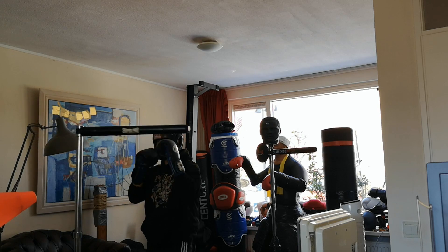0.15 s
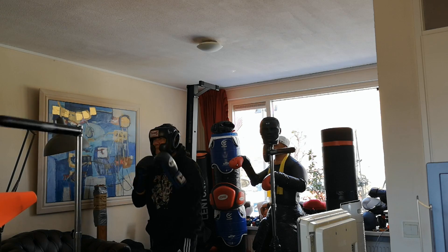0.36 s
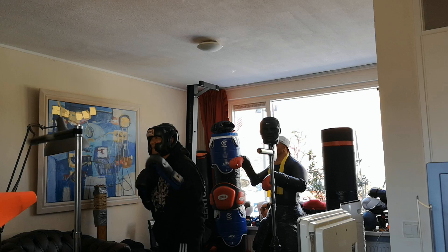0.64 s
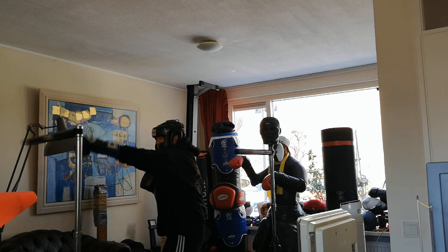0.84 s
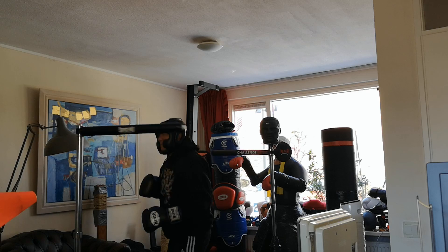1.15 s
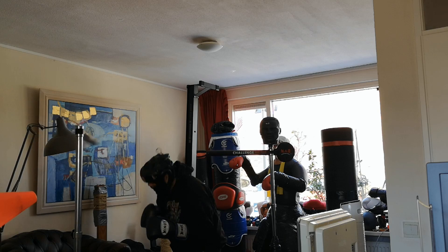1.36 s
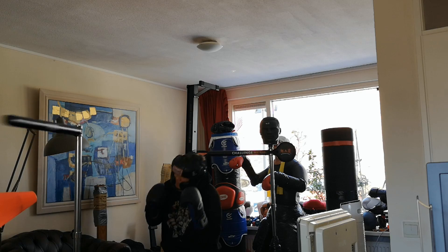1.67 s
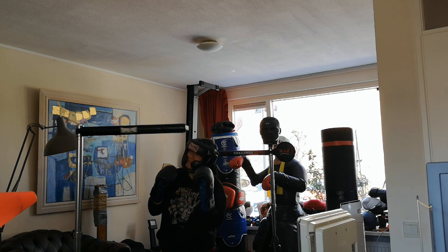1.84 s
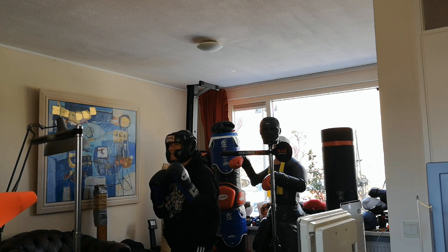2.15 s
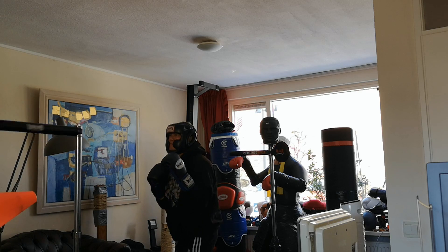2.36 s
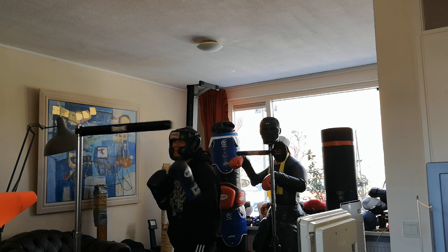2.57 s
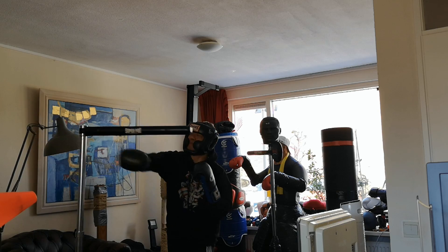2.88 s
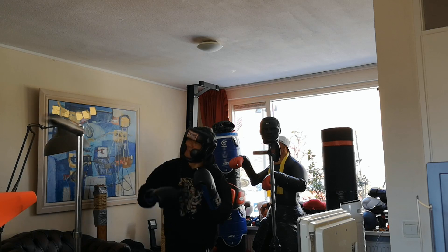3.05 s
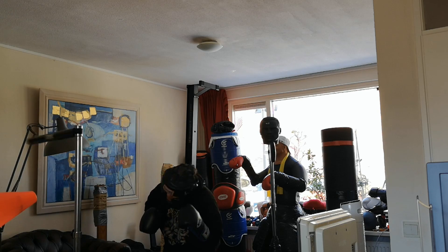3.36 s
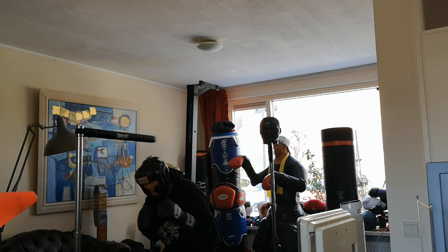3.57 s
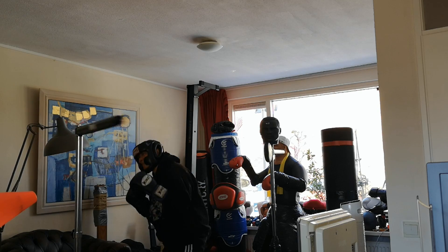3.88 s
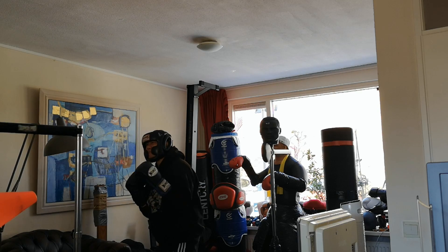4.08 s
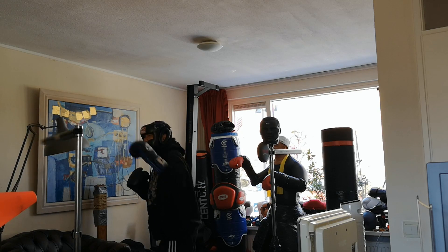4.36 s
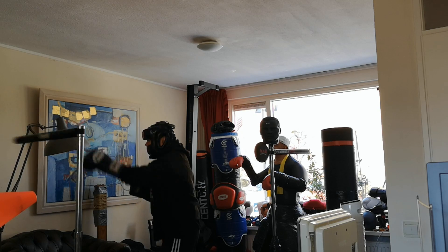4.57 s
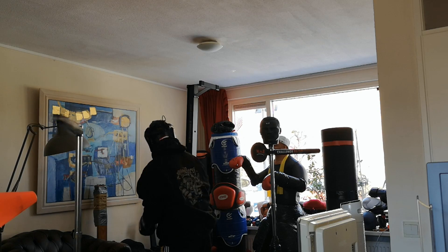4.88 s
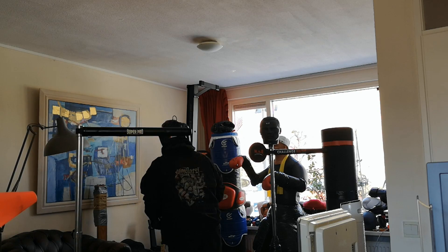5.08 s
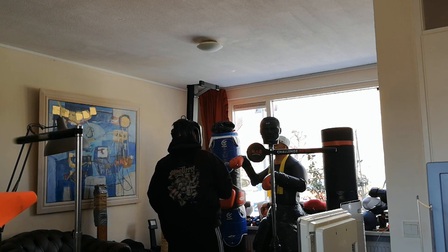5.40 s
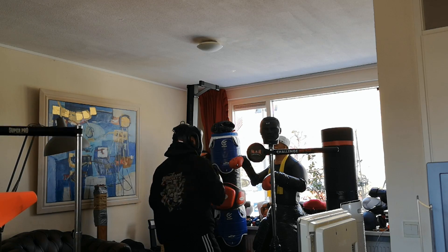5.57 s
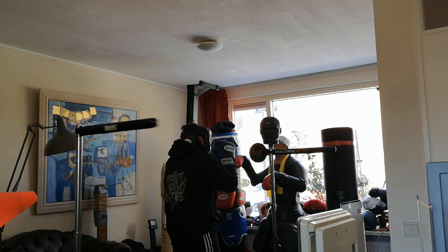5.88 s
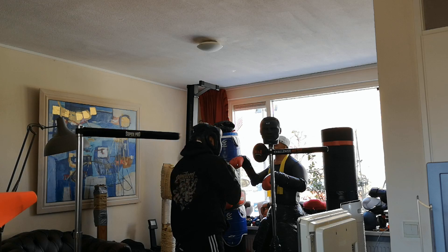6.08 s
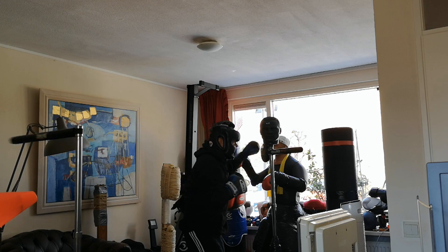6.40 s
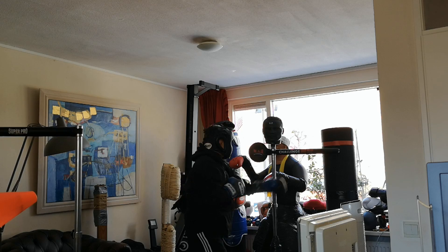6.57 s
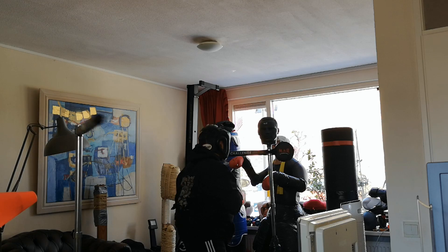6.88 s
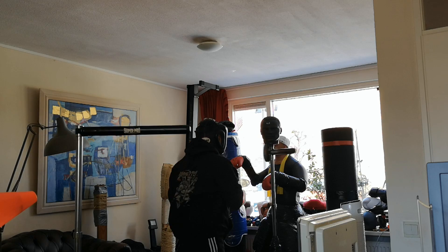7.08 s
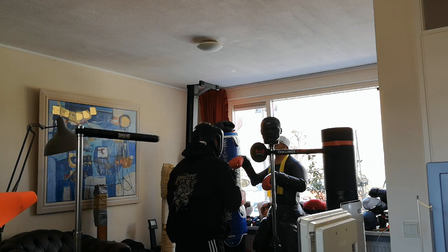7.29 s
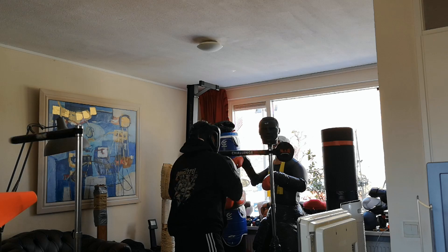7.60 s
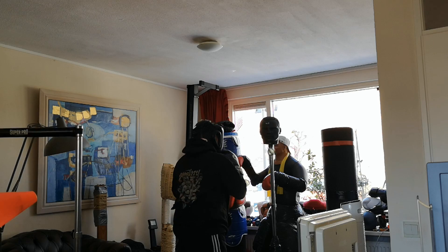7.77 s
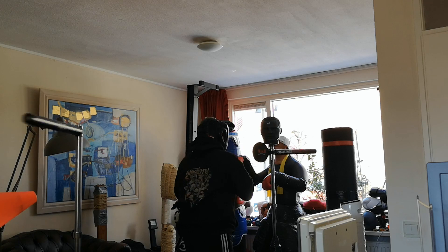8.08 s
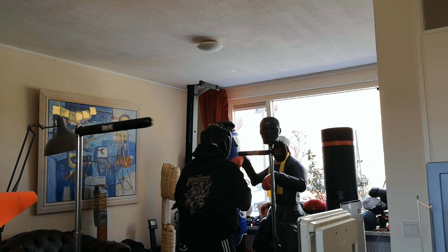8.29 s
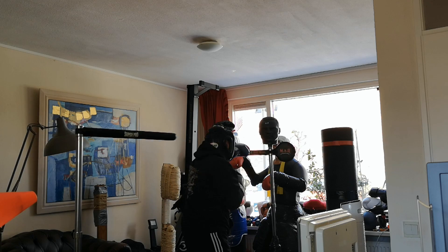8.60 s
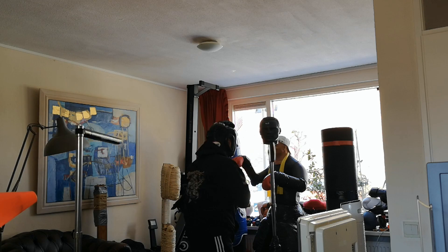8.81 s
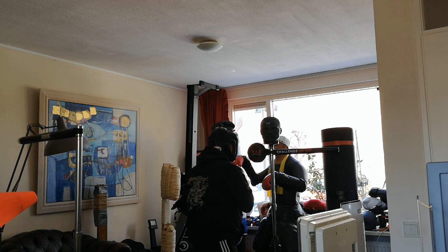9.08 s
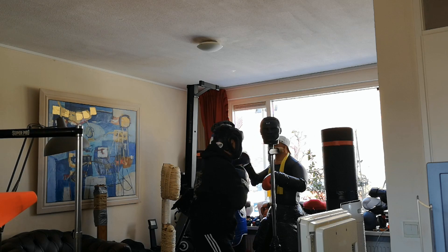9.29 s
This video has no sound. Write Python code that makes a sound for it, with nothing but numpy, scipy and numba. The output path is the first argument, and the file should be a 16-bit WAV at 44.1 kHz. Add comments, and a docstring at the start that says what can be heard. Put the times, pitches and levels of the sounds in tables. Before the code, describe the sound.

Hard, slappy boxing blows and deep floor thumps come in bursts, separated by faint scuffing shoes, light taps and a very quiet room.

```python
"""A boxer trains in a living room, hitting padded bars and bags with gloves.
A hard blow opens; scuffs and rustles lead to a flurry from 1.2 s, then shoes drag until a second flurry at 3 s.
After soft scuffs a hard blow lands at 4.9 s; lighter blows and steps follow, with hard ones at 6.9 s and 8.9 s.
Each blow is noise shaped into a crack and a short tail; scuffs are swelling noise; jolts shake a springy floor.
A faint hush and tremor run throughout; two microphones hear it all and a suppressor turns quiet sound down."""
import sys
import numpy as np
from scipy import signal
from scipy.fft import rfft, irfft
from scipy.io import wavfile
from scipy.ndimage import uniform_filter1d
from numba import njit

SR = 44100
rng = np.random.default_rng(int(sys.argv[2]) if len(sys.argv) > 2 else 0)


def unload_audio(sound):
    """Save the sound as a 16-bit wav file, at the path given as the first command line argument."""
    columns = np.transpose(np.atleast_2d(sound))
    # keep every value between -1 and 1, then stretch to whole-number steps
    steps = np.round(np.clip(columns, -1, 1) * 32767)
    wavfile.write(sys.argv[1], SR, steps.astype(np.int16))


N = 416744  # samples, about 9.45 s

# Blows and steps, in order of time. Levels are those before the suppressor.
# Columns: start [t/s], slap [level/dB], body, edge and treble against the slap [level/dB],
# 60 dB tail fall before TAIL_FALL scales it [t/s], tail build-up [t/s], ring [f/Hz], ring against the slap [level/dB]
BLOWS = [(0.002, -34, 1, -7, -8, 0.65, 0.0038, 2420, -22),
         (0.802, -41.5, -4, -3, -29, 0.51, 0.0069, 1960, -10),
         (1.157, -31, 2.5, -11, -2, 0.64, 0.0039, 1860, -21),
         (1.19, -37.5, 5, -1.5, -10, 0.62, 0.0047, 1430, -21),
         (1.319, -38, 2, -4, -8.5, 0.72, 0.0081, 2630, -15.5),
         (1.459, -45, -14, -6.5, -0.5, 0.34, 0.0042, 1850, -3),
         (1.586, -50.5, 1, -13, -17, 1, 0.0037, 1680, -3),
         (1.608, -44, -4.5, -23, -30, 1, 0.0069, 1810, -8),
         (1.661, -42, -8.5, -17.5, -15.5, 0.62, 0.0084, 1860, -10),
         (2.526, -56, 5, -40, -33, 0.67, 0.0029, 1410, -2.5),
         (2.7, -56.5, -10, -13, -4, 0.31, 0.0027, 1850, -6),
         (3.015, -39.5, -7, -8, -11.5, 0.48, 0.015, 1850, -12),
         (3.158, -30, 4.5, -13, -3.5, 0.62, 0.0056, 1770, -8),
         (3.199, -30, -9, -5.5, -20, 0.36, 0.0044, 1690, -23),
         (3.277, -35, 3.5, -19, -6, 0.62, 0.0026, 2360, -7),
         (3.34, -36, 0, -9.5, -7.5, 0.64, 0.0075, 1780, -10.5),
         (3.469, -44.5, -7, 0.5, -1, 0.4, 0.0095, 1770, -3.5),
         (3.759, -50.5, -6, 7.5, 1, 0.45, 0.036, 2730, 0.5),
         (4.886, -28.5, 5, -11.5, -1, 0.43, 0.0056, 1760, -12),
         (4.969, -38.5, -2, -10, -6, 0.98, 0.01, 1730, -19),
         (5.188, -55.5, -9, 5.5, 1, 0.3, 0.0064, 1870, -9),
         (5.471, -41.5, -10.5, -12.5, -21, 0.44, 0.0065, 1980, -16),
         (5.534, -53.5, 2.5, -24, -33, 0.45, 0.0022, 1970, -16),
         (5.847, -37, -12, -15, -16.5, 0.41, 0.0081, 2060, -13),
         (6.266, -51, 0.5, -3, -14, 0.57, 0.0058, 1680, -19),
         (6.309, -47, 0, -22, -28, 0.29, 0.0026, 1520, -5),
         (6.597, -49, -1.5, -26, -34, 1, 0.0063, 1530, -15.5),
         (6.839, -38.5, -13, -1, -25, 0.47, 0.0033, 1950, 2.5),
         (6.882, -30.5, -3.5, -10.5, -3.5, 0.49, 0.0032, 1680, -14),
         (7.147, -37.5, -11, -6.5, -22.5, 0.53, 0.0043, 1710, -25),
         (7.228, -43.5, 5, -23, -15, 0.24, 0.0046, 2750, -4),
         (7.521, -48, -13, -17, -18, 0.73, 0.0052, 1800, -6),
         (7.618, -46, -5, -23, -30, 0.48, 0.0035, 1840, -21),
         (7.731, -49.5, -9, -42, -34, 0.48, 0.0072, 1990, -22),
         (8.168, -48, -3, -15, -44, 0.46, 0.0045, 1820, -6),
         (8.6, -46, -1, -47, -43, 0.54, 0.0068, 1660, -12),
         (8.94, -31.5, 1, -9, -3, 0.53, 0.0065, 2510, -12),
         (9.215, -52.5, -7, -20, -19.5, 0.78, 0.013, 1750, -10),
         (9.306, -53.5, -18, -10, -12, 0.26, 0.0036, 1780, -16)]
# How quickly each pitch dies away. Columns: [f/Hz], factor on a blow's tail time [no unit]
TAIL_FALL = [(200, 0.53), (2000, 1.22), (6000, 1.245), (13000, 0.7)]
CRACK_DB, TAIL_DB = -3, -6.5  # against the slap
CRACK_FULL_S = 0.0045  # the build-up time at which the crack has exactly CRACK_DB
TAIL_HOLD_S = 0.098  # the tail fades faster after this
BLOW_PAN_DB = -0.5  # left minus right


def blows(hz, ringing=False):
    """Power at both ports in one band: a crack, then a noisy tail that builds up and dies away."""
    power = np.zeros(N + SR)
    t = np.arange(SR // 2 + SR // 4) / SR
    crack = undb(2 * CRACK_DB) * np.exp(-t / 0.00092)
    # after the hold, the tail dies 1.4 times as fast
    fade = t + 0.4 * np.maximum(t - TAIL_HOLD_S, 0)
    for s, db, body_db, edge_db, treble_db, t60, rise_s, _, ring_db in BLOWS:
        build_up = 1 - np.exp(-t / rise_s)
        die_away = np.exp(-2 * np.log(1000) * fade / (t60 * on_log(TAIL_FALL, hz)))
        # the slower a blow sinks in, the weaker its crack
        shape = undb(2 * TAIL_DB) * build_up * die_away + crack * (CRACK_FULL_S / rise_s) ** 3.0
        colour_db = ring_db if ringing else tilted(hz, (150., 600.), body_db, edge_db, treble_db)
        start = int(s * SR)
        power[start:start + len(t)] += undb(2 * (db + colour_db)) * shape
    return power[:N] * undb(BLOW_PAN_DB * np.array([[1], [-1]]))


# Shoes dragging and cloth rubbing. Levels are those before the suppressor.
# Columns: full strength from [t/s], rise [t/s], hold [t/s], slap-band [level/dB],
# body, edge and treble against that [level/dB], ring [f/Hz], ring against that [level/dB]
RUBS = [(0.3, 0.08, 0.13, -65.5, -10, -0.5, -6, 2100, -18), (0.55, 0.25, 0.46, -69, -15, -4, -8, 2070, -11),
        (1.036, 0.097, 0.09, -67.5, -10.5, -25, -17, 1880, -16),
        (1.93, 0.043, 0.062, -65, -15.5, -25, -26, 1970, -15),
        (2.4, 0.15, 0.095, -66, -19, -1.5, -15, 2270, -24), (2.6, 0.1, 0.06, -69.5, -9, -23, -17, 1900, 0),
        (2.75, 0.042, 0.052, -55, -36, -20, -7.5, 1790, 3.5),
        (2.808, 0.097, 0.039, -49.5, -27, -3.5, -11, 2320, -12),
        (2.88, 0.061, 0.017, -52.5, -5.5, -27, -31, 2100, -8),
        (2.96, 0.04, 0.062, -58.5, -15, -9, -11, 2060, -13), (3.62, 0.05, 0.14, -69, -8, -8, -2, 2060, -18),
        (4.08, 0.06, 0.02, -68.5, -21, -20, -14, 1990, -16),
        (4.21, 0.055, 0.07, -66, -11, -17, -10, 2100, -13),
        (4.291, 0.01, 0.17, -46.5, -30.5, -7.5, -15.5, 2160, -4),
        (4.73, 0.099, 0.051, -61.5, -16, -32, -15, 2000, -14),
        (5.27, 0.023, 0.078, -69.5, -7, -7, -8, 2100, -13.5),
        (5.44, 0.29, 0.027, -61.5, -15, -11, -6, 2160, -20),
        (6.14, 0.17, 0.11, -69, -28.5, 11, -15, 2300, -4),
        (6.19, 0.06, 0.11, -66.5, -14, 7, -10, 2250, -24),
        (6.33, 0.16, 0.087, -56, -15.5, -2.5, -10, 2080, -20), (6.54, 0.05, 0.05, -76, -9, 8, -6, 2320, -7),
        (6.76, 0.12, 0.02, -63, -11.5, -13, -9, 2060, -15), (7.4, 0.042, 0.052, -78, -9, -17, 1, 2100, -16),
        (7.58, 0.06, 0.026, -64, -20, 4, -4.5, 2000, -20), (7.9, 0.08, 0.22, -75, -11, 3, -9, 2200, -2),
        (8.3, 0.1, 0.22, -63.5, -33, -4.5, -11, 2170, -4),
        (8.86, 0.36, 0.04, -67, -11, -9, -16, 2060, -18.5)]
RUB_RISE_DB = 18  # climbed during the rise
RUB_SAG_DB_S, RUB_FALL_DB_S = 11.5, 170  # dB/s lost while held, and after


def rubs(hz, grain, ringing=False):
    """Power of dragging and rubbing in one band; each swells, holds and fades, in uneven slips."""
    power = np.zeros(N + 2 * SR)
    t = np.arange(-SR // 2, SR // 2) / SR  # 0 is the moment of full strength
    for s, rise_s, hold_s, db, body_db, edge_db, treble_db, _, ring_db in RUBS:
        colour_db = ring_db if ringing else tilted(hz, (300., 800.), body_db, edge_db, treble_db)
        rise_db = RUB_RISE_DB * np.minimum(t, 0) / rise_s
        shape_db = rise_db + swell_db(t, RUB_SAG_DB_S, hold_s, RUB_FALL_DB_S)
        start = int(s * SR)
        power[start:start + len(t)] += undb(2 * (db + colour_db + shape_db))
    return power[SR // 2:SR // 2 + N] * grain


RING_HZ = 420  # width of each of the two band-passes that make the narrow ring near 2 kHz in blows and rubs


def ring(noise, grain):
    """A narrow resonance on noise: at the latest blow's pitch, or gliding between rub pitches if rubs are louder."""
    t = np.arange(N) / SR
    starts, pitch = np.transpose(BLOWS)[[0, 7]]
    hz = pitch[np.maximum(np.searchsorted(starts, t) - 1, 0)]
    struck = blows(2400.0, ringing=True)
    rubbed = rubs(2000., grain, ringing=True)
    starts, pitch = np.transpose(RUBS)[[0, 7]]
    hz = np.where(rubbed > struck.mean(axis=0), np.interp(t, starts, pitch), hz)
    width = 1. * RING_HZ
    tone = np.array([svf(svf(port, hz, width), hz, width) for port in irfft(noise, N)])
    return tone / tone.std() * soft(struck + rubbed, 2000.)


# Tone colour of the room and microphone. Columns: [f/Hz], level per Hz [level/dB]
COLOUR = [(88, -3), (150, -5.5), (221, -15.5), (346, -18), (429, -17.5), (621, -23), (934, -18),
          (1710, -19.5), (1880, -16.5), (2720, -19), (4610, -31), (9280, -36.5), (11300, -49.5),
          (14500, -56.5), (15700, -57)]
BANDS_HZ = 160 * 2 ** np.arange(0, 6.7, 1 / 2)  # band centres


def room_sounds():
    """Blows, rubs and the room's hush, band by band on noise heard by both ports."""
    hz, noise = pair(direct=0.14, apart_hz=450, spread_db=3.0)
    grain = undb(2 * 0.68 * walk(66))
    swell = walk(2.894)
    colour = undb(on_log(COLOUR, hz))
    out = ring(noise, grain)
    for centre, window in zip(BANDS_HZ, bands(hz)):
        carrier = irfft(noise * window * colour, N) * np.sqrt(SR / 2)
        power = blows(centre) + rubs(centre, grain) + hush(centre, swell)
        flicker = undb(1.3 * walk(25))
        out = out + carrier * flicker * soft(power, centre)
    return out


# Springy floor: each mode is two equal resonances in a row.
# Columns: [f/Hz], width of one resonance [f/Hz], strength [level/dB]
FLOOR_MODES = [(27.16, 7.8, 0.5), (39.26, 18, -0.5), (49.24, 7.4, 0), (57.32, 8.3, 0), (83.1, 34, 4),
               (113.7, 13.5, 0.5), (146.3, 18.5, -6), (180.7, 48, -17.5), (259.8, 25.8, -20)]
# Jolts of the floor. Columns: start [t/s], deep modes [level/dB], middle and top modes together [level/dB],
# shakes on for [t/s]
JOLTS = [(0.0, -22, -31, 0.19), (0.25, -40.5, -60.5, 0.037), (0.46, -57.5, -72, 0.18),
         (0.803, -51.5, -54.5, 0.12), (1.156, -25, -25.5, 0.24), (1.249, -19, -27.5, 0.12),
         (1.345, -24.5, -34, 0.11), (1.601, -38.5, -46.5, 0.17), (1.87, -56, -73, 0.034),
         (2.2, -72, -74, 0.2), (2.52, -57.5, -70, 0.24), (2.72, -57.5, -75, 0.1),
         (2.81, -47.5, -55.5, 0.06), (2.87, -45, -55, 0.12), (3.04, -35, -63, 0.06),
         (3.157, -27, -23.5, 0.12), (3.234, -18, -25.5, 0.1), (3.343, -20, -28, 0.15),
         (3.59, -39.5, -54, 0.022), (3.72, -49, -60.5, 0.3), (4.41, -60, -80, 0.086),
         (4.62, -67, -75, 0.08), (4.887, -19.5, -25, 0.36), (5.43, -51, -70, 0.05),
         (5.472, -52.5, -51, 0.16), (5.848, -50.5, -48.5, 0.079), (6.29, -50, -53, 0.17),
         (6.598, -63, -57, 0.12), (6.72, -53, -63, 0.1), (6.841, -42, -35, 0.05),
         (6.884, -24.5, -28, 0.092), (7.06, -39.5, -49, 0.016), (7.15, -39.5, -42.5, 0.14),
         (7.521, -55, -53, 0.073), (7.81, -61, -83, 0.032), (7.97, -61, -85, 0.12), (8.168, -59, -55, 0.07),
         (8.42, -62, -70, 0.1), (8.6, -54, -49, 0.082), (8.941, -26.5, -29.5, 0.032),
         (8.98, -24, -33, 0.056), (9.089, -46, -40.5, 0.025), (9.16, -39.5, -52, 0.1),
         (9.32, -50, -70, 0.2)]
# One row each for the deep, middle and top modes. Columns: build-up [t/s], loss while shaking [dB/s],
# loss after [dB/s], tremor at rest [level/dB], its wander [level/dB]
FLOOR_SWING = [(0.006, 42, 168, -67, 2.5), (0.0057, 55.5, 187, -75, 2.6), (0.0042, 91, 223, -81.5, 3.5)]
KNOCK_DB = -7.5  # top minus middle modes at the heaviest jolt
KNOCK_PER_DB = 0.27  # dB gained for each dB lighter


def floor_shake():
    """Deep and upper floor modes, shaken by each jolt over a faint tremor; almost alike at both ports."""
    hz, noise = pair(direct=0.0071, apart_hz=1490, spread_db=3.5)
    out, t = 0, np.arange(SR) / SR
    starts, deep_db, upper_db, holds = np.transpose(JOLTS)
    groups = FLOOR_MODES[:4], FLOOR_MODES[4:6], FLOOR_MODES[6:]
    # light steps knock higher than heavy blows
    tilt_db = KNOCK_DB - KNOCK_PER_DB * (upper_db - upper_db.max())
    middle_db = upper_db - 10 * np.log10(1 + undb(2 * tilt_db))
    levels = deep_db, middle_db, middle_db + tilt_db
    for modes, jolt_db, swing in zip(groups, levels, FLOOR_SWING):
        rise_s, sag_db_s, fall_db_s, rest_db, wander_db = swing
        power = np.zeros(N + SR)
        for s, db, hold_s in zip(starts, jolt_db, holds):
            shape = (1 - np.exp(-t / rise_s)) * undb(db + swell_db(t, sag_db_s, hold_s, fall_db_s))
            power[int(s * SR):int(s * SR) + SR] += shape ** 2
        response = sum(undb(g) * (w / 2 / (w / 2 + 1j * (hz - f))) ** 2 for f, w, g in modes)
        shaking = irfft(noise * response, N)
        # the jolts set the strength, so the chance swells of the shaking are evened out
        even = shaking / np.sqrt(uniform_filter1d(np.mean(shaking ** 2, axis=0), size=3500))
        tremor = undb(2 * (rest_db + wander_db * walk(4.2)))
        out = out + even * np.sqrt(power[:N] + tremor)
    return out


# Quiet room, only the balance of pitches. Columns: [f/Hz], level per Hz [level/dB]
HUSH = [(88, -28), (150, 6.5), (172, -32.5), (274, -14), (609, -27.5), (754, -4.5), (934, -21),
        (1780, -15.5), (7070, -29), (10000, -35), (13000, -34.5), (15700, -42.5)]
HUSH_DB = -66  # level from 712 to 5340 Hz, before its swells and the suppressor


def hush(centre, swell):
    """Power of the quiet room in one band, slowly swelling; the carrier's own colour is taken off."""
    level_db = HUSH_DB - band_db(HUSH, 712.0, 5340.0)
    return undb(2 * (level_db + on_log(HUSH, centre) - on_log(COLOUR, centre) + .8 * swell))


# Balance of the two ports. Columns: [f/Hz], left minus right [level/dB]
PORT_DB = [(200, 0), (500, -0.5), (1500, -2), (4000, -1), (8000, 0), (12000, -4)]
PORT_LAG = 26  # samples by which the left port hears the wave later


def pair(direct, apart_hz, spread_db):
    """Spectra of noise at both ports: one wave from the right, the rest diffuse and alike only in the bass."""
    hz = np.fft.rfftfreq(N, 1 / SR)
    wave, mid, side = rfft(patchy(rng.standard_normal((3, N)), spread_db, hz=50, s=.08))
    left_right = np.array([[1], [-1]])
    w = hz / np.hypot(hz, apart_hz)
    diffuse = (mid + w * side * left_right) / np.sqrt(1 + w ** 2)
    late = np.exp(-2j * np.pi * hz * PORT_LAG / SR * np.array([[1], [0]]))
    ports = undb(on_log(PORT_DB, hz) * left_right / 2)
    return hz, ports * (np.sqrt(direct) * wave * late + np.sqrt(1 - direct) * diffuse)


def patchy(x, spread_db, hz, s):
    """Noise made uneven: small random patches of pitch and time are louder or fainter."""
    z = signal.stft(x, nperseg=2048)[2]
    field = rng.standard_normal(z.shape[1:])
    for axis, size in enumerate((hz * 2048 / SR, s * SR / 1024)):
        field = uniform_filter1d(field, max(int(size), 1), axis=axis)
    z = z * undb(spread_db * field / field.std())
    y = signal.istft(z)[1][:, :N]
    return y * x.std() / y.std()


def bands(hz):
    """Half-octave windows that overlap so that their powers add to one."""
    place = 2 * np.log2(np.maximum(hz, 1) / BANDS_HZ[:, None])
    return np.cos(np.pi / 2 * np.clip(place, -1, 1))


def tilted(hz, body_hz, body_db, edge_db, treble_db):
    """Gain dB at hz that gives body, edge and treble their levels against the slap band."""
    slap = band_db(COLOUR, 800., 4000.)
    body, edge, treble = [band_db(COLOUR, *band) - slap for band in (body_hz, (3200., 5500.), (5500., 10000.))]
    corners_hz = [400, 1300, 2500, 4200, 7000]
    extra_db = [body_db - body, 0, 0, edge_db - edge, treble_db - treble]
    return np.interp(np.log(hz), np.log(corners_hz), extra_db) - slap


def band_db(table, lo_hz, hi_hz):
    """Level of a spectrum between two frequencies, from its mean power per Hz."""
    density = undb(2 * on_log(table, np.linspace(lo_hz, hi_hz, num=200)))
    return 10 * np.log10(np.mean(density) * (hi_hz - lo_hz))


def swell_db(t, sag_db_s, hold_s, fall_db_s):
    """Level in dB after the top: a slow sag while held, then a steep fall."""
    return -sag_db_s * np.clip(t, 0, hold_s) - fall_db_s * np.maximum(t - hold_s, 0)


def soft(power, hz):
    """Amplitude that takes two cycles of hz to rise, as a resonance does."""
    k = int(2 * SR / hz)
    return uniform_filter1d(np.sqrt(np.maximum(power, 0)), k, origin=(k - 1) // 2)


def walk(rate):
    """Random levels held 1 / rate s and smoothed twice into slopes; spread near 1."""
    k = int(SR / rate)
    steps = np.repeat(rng.standard_normal(N // k + 1), k)
    return 1.23 * uniform_filter1d(uniform_filter1d(steps, k), k)[:N]


@njit
def svf(x, hz, width_hz):
    """State-variable band-pass whose centre moves, gain 1 at the centre."""
    y, b, l = np.empty(len(x)), 0., 0.
    for i in range(len(x)):
        g, k = np.tan(np.pi * hz[i] / SR), width_hz / hz[i]
        v = (b + g * (x[i] - l)) / (1 + g * (g + k))
        b, l, y[i] = 2 * v - b, l + 2 * g * v, k * v
    return y


def undb(db):
    """dB to gain; undb(2 * dB) gives power."""
    return 10 ** (np.asarray(db) / 20)


def on_log(table, hz):
    """Read a (Hz, value) table on a log-frequency axis."""
    f, v = np.transpose(table)
    return np.interp(np.log(np.maximum(hz, 1)), np.log(f), v)


@njit
def follow(power, rise, fall):
    """Level follower, quick to rise and slower to fall."""
    out, e = np.empty(len(power)), power[0]
    for i in range(len(power)):
        e += (power[i] - e) * (rise if power[i] > e else fall)
        out[i] = e
    return out


def suppress(x, knee_db, slope, depth_db):
    """Sound under the knee is turned down, the more the quieter it is, by depth_db at most."""
    # the averaging window reaches further ahead than behind
    smooth = uniform_filter1d(np.mean(x ** 2, axis=0), size=900, origin=-150)
    heard_db = 10 * np.log10(follow(smooth, 1 / (0.0013 * SR), 1 / (0.006 * SR)) + 1e-14)
    return x * undb(np.clip(slope * (heard_db - knee_db), -depth_db, 0))


def scene():
    """Everything in the room, at both ports."""
    return room_sounds() + floor_shake()


TOP_HZ = 15850  # nearly nothing passes above this


def record(dry):
    """The suppressor works above the bass; the microphone loses the deepest bass and the top is cut."""
    bass = signal.sosfiltfilt(signal.butter(2, 170, fs=SR, output="sos"), dry)
    heard = bass + suppress(dry - bass, knee_db=-51.5, slope=0.5, depth_db=9)
    heard = signal.sosfilt(signal.butter(4, 23, "highpass", fs=SR, output="sos"), heard)
    return signal.sosfilt(signal.ellip(12, .2, 60, TOP_HZ, fs=SR, output="sos"), heard)


dry = scene()
out = record(dry)
unload_audio(out)
```